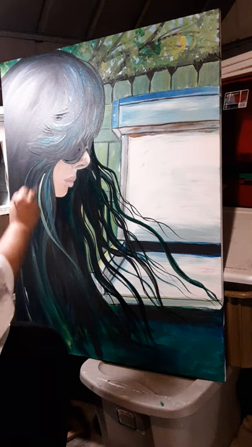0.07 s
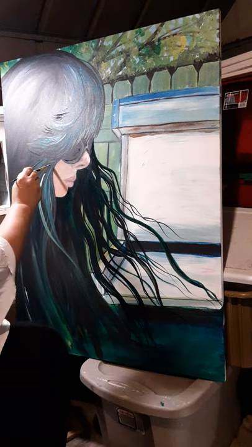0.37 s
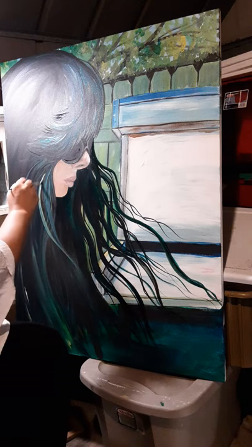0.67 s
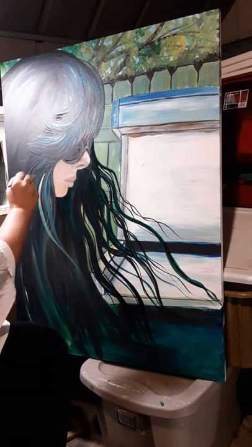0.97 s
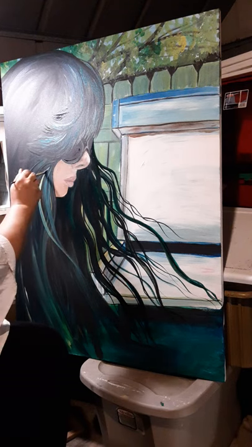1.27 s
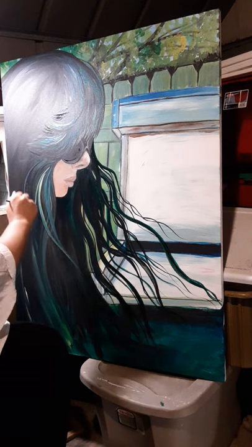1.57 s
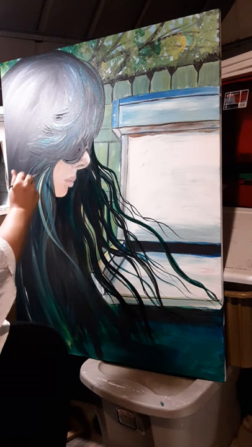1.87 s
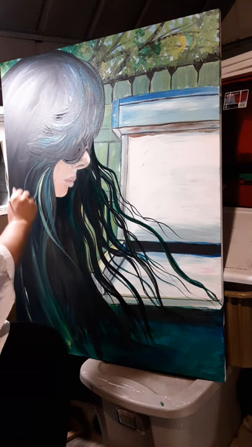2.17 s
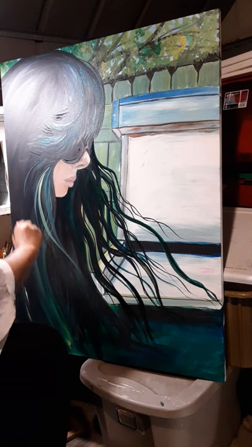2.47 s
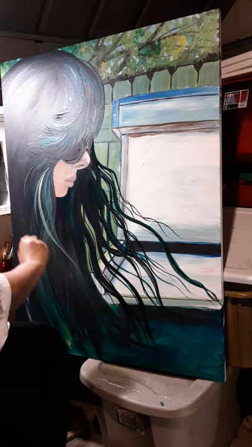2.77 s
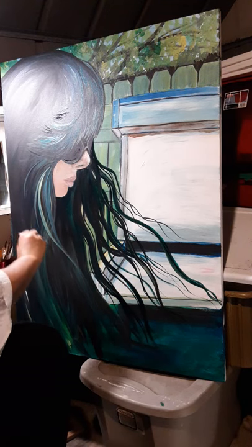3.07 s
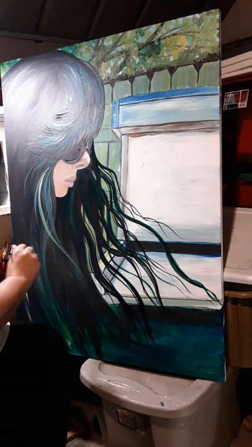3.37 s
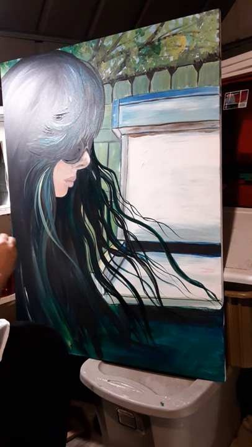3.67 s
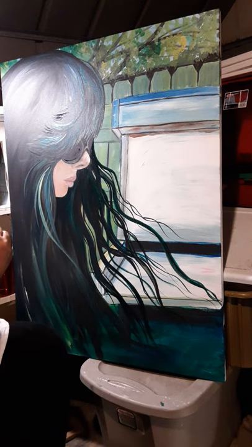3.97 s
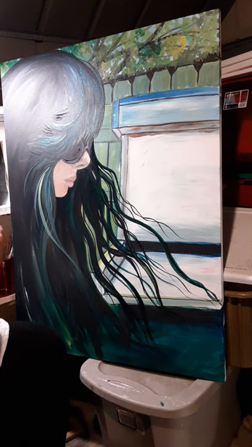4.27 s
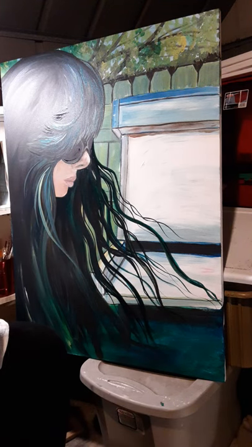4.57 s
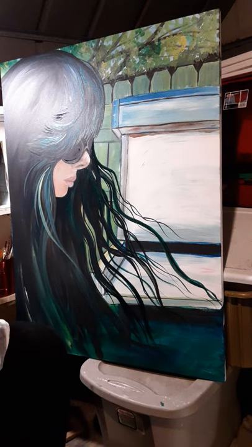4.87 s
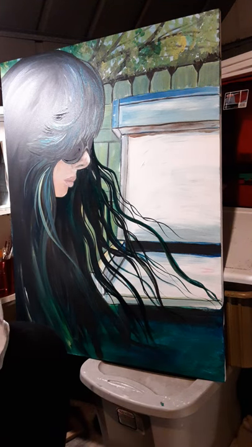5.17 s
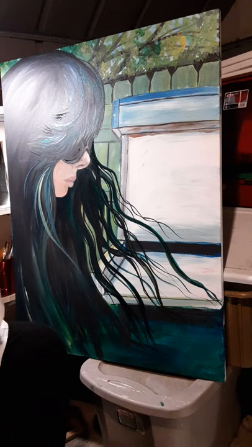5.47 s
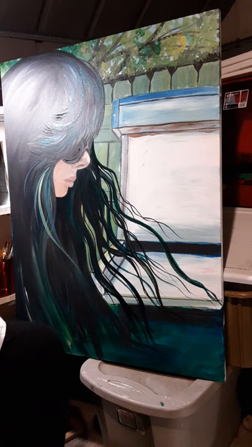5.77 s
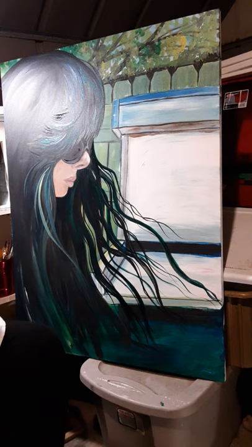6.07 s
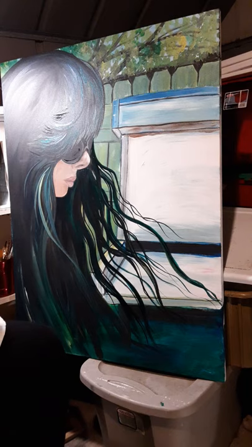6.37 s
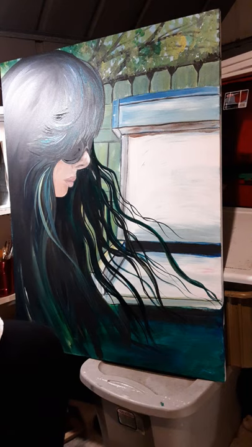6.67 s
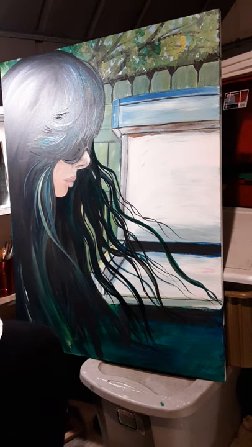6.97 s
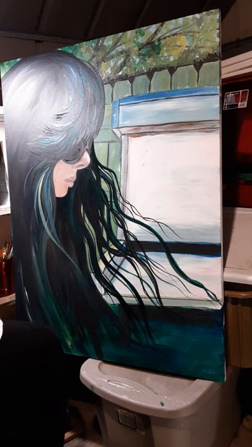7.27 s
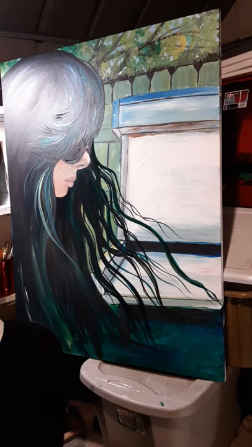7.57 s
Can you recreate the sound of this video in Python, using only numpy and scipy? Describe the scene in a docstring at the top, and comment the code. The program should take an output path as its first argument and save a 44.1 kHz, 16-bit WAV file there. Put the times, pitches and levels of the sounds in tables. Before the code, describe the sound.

Raindrops tap on a roof, thickening into heavier patter and then easing, over a faint steady hum indoors.

```python
"""A small, hard-walled room under a rainy roof, heard from one microphone inside.
Single drops land overhead at first, then a spell of heavier patter sets in. Each drop is a short click,
coloured by the roof and drawn out by the walls; one lands on something hard that rings.
Underneath lie a faint mains and motor hum and the rush of the room's air."""
import sys
import numpy as np
from scipy import signal
from scipy.fft import rfft, irfft, next_fast_len
from scipy.io import wavfile
from scipy.ndimage import map_coordinates

SR = 44100
rng = np.random.default_rng(int(sys.argv[2]) if len(sys.argv) > 2 else 0)


def unload_wav(signal):
    """Save mono or channel-first audio to the path in sys.argv[1] as 16-bit WAV at rate SR, clipped to [-1, 1]."""
    wavfile.write(
        sys.argv[1],
        SR,
        np.round(np.clip(np.atleast_2d(signal).T, -1, 1) * 32767).astype(np.int16),
    )


N = 344862


def amp(db):
    """Decibels to gain."""
    return 10 ** (np.asarray(db) / 20)


def unit(x):
    """Scale to rms 1."""
    return x / np.sqrt(np.mean(x ** 2) + 1e-20)


def along(points, hz):
    """Read (freq_hz, value) points on a log frequency axis."""
    freqs, values = np.transpose(points)
    return np.interp(np.log(hz + 1), np.log(freqs + 1), values)


def wobble(rate, size):
    """A smooth random curve, rate knots a second."""
    knots = rng.standard_normal(int(size * rate / SR) + 4)
    return map_coordinates(knots, [np.arange(size) * rate / SR])


def filtered(x, gain):
    """Apply a gain that depends on frequency."""
    size = next_fast_len(len(x) + 4096)
    return irfft(rfft(x, size) * gain(np.fft.rfftfreq(size, 1 / SR)), size)[:len(x)]


def add(track, start_s, sound):
    """Mix a sound into the track."""
    part = track[max(round(start_s * SR), 0):][:len(sound)]
    part += sound[:len(part)]


def room_tone(air_db=-64.0, waver_db=2.9, drift_rad=.35):
    """A slightly unsteady hum in the low rush and faint hiss of the room's air."""
    # spectrum of the air: freq_hz, gain_db
    air_colour = [(20, -32), (42, -14), (57, -3), (72, -5), (108, 3.5), (135, -9), (185, 0.5), (215, -6),
                  (300, -9), (850, -15.5), (1700, -30.5), (3500, -39.5), (5200, -32.5), (8300, -33.5),
                  (9500, -50), (10600, -33.5), (15500, -34.5)]
    # mains and motor lines: pitch_hz, rms_db
    hum_lines = [(59.8, -74.5), (94.3, -77.5), (107.5, -74.5), (120, -71), (166, -76), (178, -73.5),
                 (240, -64.5), (359, -79)]
    t = np.arange(N) / SR
    air = unit(filtered(rng.standard_normal(N), lambda hz: amp(along(air_colour, hz))))
    hum = np.zeros(N)
    for hz, db in hum_lines:
        level = amp(db + waver_db * wobble(4.4, N))
        hum += level * np.sin(2 * np.pi * hz * t + drift_rad * wobble(3.1, N))
    return amp(air_db) * air + np.sqrt(2) * hum


def room_tail(hold_s=.014):
    """The room's answer to a click: dense wall echoes hold briefly, then the treble dies first."""
    # reverberation time: freq_hz, t60_s
    decay = [(150, 0.59), (400, 0.39), (1000, .31), (2700, 0.28), (7000, 0.21), (15000, 0.19)]
    hz, t, spectrum = signal.stft(rng.standard_normal(SR // 2), SR, nperseg=256)
    fade_db = -60 * np.maximum(t - hold_s, 0) / along(decay, hz)[:, None]
    return signal.istft(spectrum * amp(fade_db), SR, nperseg=256)[1]


def roof_db(hz):
    """The lift that the roof's resonances give to whatever lands on it."""
    # roof resonances: centre_hz, width_hz, lift_db
    modes = [(358, 37, 4), (724, 33, 1), (932, 87, 3), (1475, 115, 1.5), (2346, 105, 2)]
    return sum(db / (1 + ((hz - centre) / (width / 2)) ** 2) for centre, width, db in modes)


def rain_db():
    """The strength of the rain at every sample: it builds, then eases a little."""
    # rain over the whole roof: time_s, level_db
    strength = [(0, -79), (2.3, -69.5), (3.3, -65.5), (4.4, -63), (4.7, -58), (5.6, -55), (6.3, -56.5),
                (6.9, -60.5), (7.8, -62)]
    return np.interp(np.arange(N) / SR, *np.transpose(strength))


def drop_rate(heavy_per_s, doubling_db, heavy_db=-55):
    """Drops a second at every sample: the stronger the rain, the denser they fall."""
    return heavy_per_s * 2 ** ((rain_db() - heavy_db) / doubling_db)


def far_patter(scatter_db=3, patches=6):
    """Many small distant drops, dulled by the roof; each patch of roof has its own echoes."""
    # spectrum of the distant drops: freq_hz, gain_db
    colour = [(45, -15), (120, -3.5), (180, 2), (400, -3), (800, -8), (1500, -15), (3000, -23.5),
              (8000, -22.5), (15500, -33)]
    density = drop_rate(heavy_per_s=100, doubling_db=14)
    rain = np.zeros(N)
    for _ in range(patches):
        lands = rng.random(N) < density / (SR * patches)
        sizes = amp(scatter_db * np.clip(rng.standard_normal(N), -2, 2))
        rain += signal.fftconvolve(lands * sizes, room_tail())[:N]
    rain = filtered(rain / np.sqrt(density), lambda hz: amp(along(colour, hz) + roof_db(hz)))
    return amp(rain_db()) * unit(rain)


def spot_db(hz, depth_db=2.0, spacing_hz=140, corner_hz=3500):
    """Each landing spot favours the roof's modes differently: a ripple that evens out in the treble."""
    ripple = map_coordinates(rng.standard_normal(512), [hz / spacing_hz], mode="mirror")
    return depth_db * ripple / np.sqrt(1 + (hz / corner_hz) ** 2)


def spray_db(level_db, thud_db, click_db, burst_above_db=-31):
    """A drop's fine spray: less from a dull landing, more from a sharp one or a drop that bursts."""
    burst_db = 1.3 * max(level_db - burst_above_db, 0)
    return -10 - .2 * thud_db + .15 * click_db + burst_db


def drop(start_s, level_db, thud_db, knock_db, click_db):
    """One near drop as (start_s, sound): a direct click and its echoes, tinted by where it lands."""
    # spectrum common to the near drops: freq_hz, gain_db
    colour = [(53, -45), (90, -15.5), (176, -3), (209, -7), (242, -3.5), (527, -3.5), (667, 0.5),
              (1070, -4.5), (1720, -6), (1840, -5), (3900, -12.5), (7950, -8), (9050, -12.5), (13000, -9.5),
              (15500, -14)]
    thud_hz, knock_hz, tick_hz, spray_hz = 670, 1830, 4850, 12100
    tint = [(thud_hz, thud_db), (knock_hz, knock_db), (tick_hz, 0),
            (spray_hz, spray_db(level_db, thud_db, click_db))]
    colour_rms = np.sqrt(np.mean(amp(along(colour, np.linspace(0, SR / 2, SR))) ** 2))
    lead = 128  # samples for the filter to spread ahead of the click
    hit = np.pad(room_tail(), (lead, 0))
    hit[lead] += amp(click_db)
    hit = filtered(hit, lambda hz: amp(along(colour, hz) + along(tint, hz) + roof_db(hz) + spot_db(hz)))
    return start_s - lead / SR, amp(level_db) * hit / colour_rms


def small_drops(over_rain_db=3, thud_db=4, knock_db=4, click_db=10, scatter_db=1.5):
    """Lesser drops land overhead at uneven moments, more and louder as the rain thickens."""
    fallen = np.cumsum(drop_rate(heavy_per_s=14, doubling_db=2.5)) / SR
    strength_db, track = rain_db(), np.zeros(N)
    for k in range(int(fallen[-1])):
        at = np.searchsorted(fallen, k + rng.random())
        typical_db = [strength_db[at] + over_rain_db, thud_db, knock_db, click_db]
        add(track, *drop(at / SR, *rng.normal(typical_db, scatter_db)))
    return track


def ping(start_s=6.375, gain_db=-38, blur=0.81, blur_per_s=220, hold_s=0.022, knock_db=12, knock_hz=2300):
    """One drop knocks on a hard object that rings; wall echoes blur each of its modes."""
    # modes of the object: pitch_hz, level_db, t60_s
    modes = [(610, -9, 0.22), (940, -6, 0.21), (1190, -5, 0.17), (1520, -1, 0.2), (1690, -1, .19),
             (2140, -12.5, 0.21), (2350, -4.5, 0.15), (3260, 0, 0.15), (6200, -7.5, 0.15),
             (6500, -14, 0.19), (7960, -16, 0.17), (11130, -17, 0.16), (13080, -19, .16),
             (13720, -25.5, .16)]
    size = SR // 2
    t = np.arange(size) / SR
    ring = np.zeros(size)
    for hz, db, t60 in modes:
        echoes = 1 + blur * (wobble(blur_per_s, size) + 1j * wobble(blur_per_s, size))
        tone = np.real(echoes * np.exp(2j * np.pi * (hz * t + rng.random())))
        fade = amp(-60 * np.maximum(t - hold_s, 0) / t60)
        mode = tone * fade
        ring += amp(db) * mode * np.linalg.norm(fade) / np.linalg.norm(mode)
    attack = 1 - np.exp(-t / 0.00068)
    knock = filtered(room_tail()[:size], lambda hz: hz / (hz + 200) / (1 + (hz / knock_hz) ** 2))
    track = np.zeros(N)
    add(track, start_s, amp(gain_db) * (ring * attack + amp(knock_db) * knock))
    return track


def big_drops():
    """The drops that stand out, landing on the roof above the microphone."""
    # landings: start_s, level_db, thud_db, knock_db, click_db (the last three relative to the level)
    landings = [(0.371, -54.5, 3.5, 2.5, 9), (0.588, -40, 0, -4, 6), (0.683, -47, 9.5, 3, 1),
                (0.809, -57.5, 4, -3, 6), (1.232, -37.5, 0, -3, 3), (1.765, -47.5, 7, -2, 9),
                (1.991, -56, 6.5, 2, 5), (2.229, -55.5, -5, -6, 6), (2.507, -52.5, 6, -6, 4),
                (2.555, -53, -6, -2, 6), (2.71, -46.5, 1.5, 0, 6), (2.928, -41.5, -3.5, -2, 3),
                (3.034, -50, 0, 0, 6), (3.289, -49.5, 13, 6.5, 3), (3.363, -38.5, 1, -.5, 0),
                (3.759, -33, -5, -4, 9), (3.899, -55.5, -8, -.5, 6), (3.98, -49, 4, 4, 2),
                (3.993, -39, 1, -3, 8), (4.154, -52, -1, 0, 8), (4.169, -47, 7.5, 6.5, 5),
                (4.27, -36, -6.5, -5.5, 16), (4.455, -58, 10, 5, 8), (4.519, -48, 8, 1, 6),
                (4.534, -45.5, 2, 3.5, 7), (4.587, -42, 2.5, -2.5, 6), (4.63, -39, -11, -1, 6),
                (4.663, -48, 9, -8, 17), (4.733, -38, -12, -6.5, 24.5), (4.784, -37.5, 2, 6, 11),
                (4.868, -51, 5, 6, 10), (4.889, -42.5, 4.5, 3.5, 6), (4.922, -42.5, 6.5, 1, 8),
                (5.07, -39, 4.5, 2, 19), (5.153, -46, 3, 6, 4), (5.191, -46, 5.5, 6, 8),
                (5.224, -44, .5, 3.5, 14), (5.274, -37, -.5, -3, 6), (5.298, -43, -1, 0, 24),
                (5.362, -44.5, 6, 2.5, 5), (5.422, -39, -1, -3, 25), (5.459, -38.5, -1, 0, 15),
                (5.552, -37, 1.5, 0, 9), (5.65, -44.5, 6.5, 3.5, 7), (5.764, -44.5, 2, 3, 21.5),
                (5.812, -47.5, 3.5, 0, 6), (5.895, -42.5, 1.5, 2, 8), (6.039, -40, -3, -6, 7),
                (6.055, -36, -2, -1.5, 21.5), (6.113, -41, 2.5, 16.5, 5), (6.12, -26, -10.5, -8, 22),
                (6.132, -31, -4, -2.5, 24), (6.32, -40.5, -2.5, -1.5, 7), (6.546, -52, -12, -5, 6),
                (6.568, -52, 10, 4, 9), (6.582, -46, 5.5, 2.5, 3), (6.691, -34, -1, -2.5, 9),
                (6.733, -48.5, 10, 4.5, 8), (6.938, -41.5, 1, -2, 4), (7.012, -43.5, 2, -.5, 8),
                (7.165, -52.5, 9, 3, 6), (7.612, -53.5, 5, -5, 6), (7.644, -53.5, 3.5, 4.5, 6),
                (7.705, -51.5, -1, -4, 6)]
    track = np.zeros(N)
    for landing in landings:
        add(track, *drop(*landing))
    return track


def scene():
    """Everything as it reaches one microphone in the room."""
    return (big_drops() + ping() + far_patter() + room_tone() + small_drops())[None]


def record(dry, top_hz=15850):
    """The recorder keeps nothing above its band limit."""
    return np.array([filtered(channel, lambda hz: hz < top_hz) for channel in dry])


dry = scene()
out = record(dry)
unload_wav(out)
```